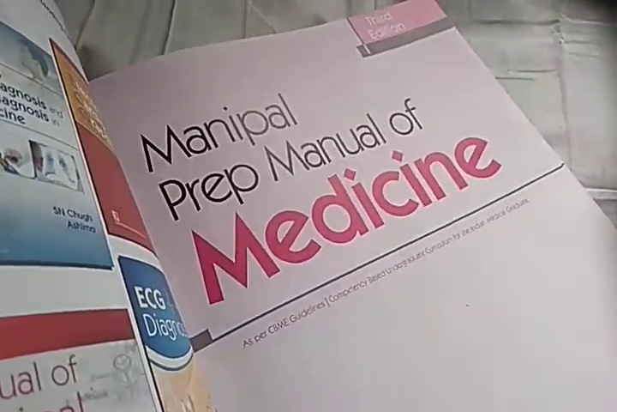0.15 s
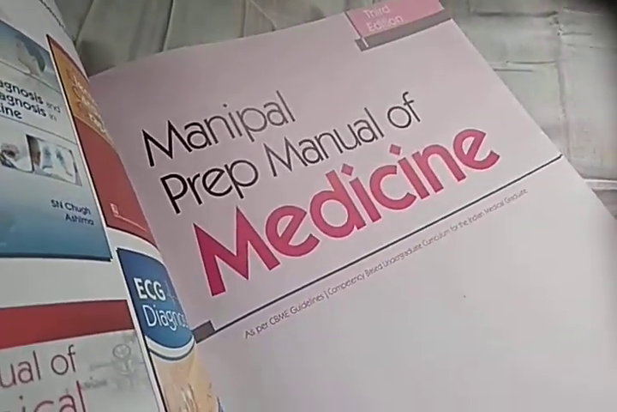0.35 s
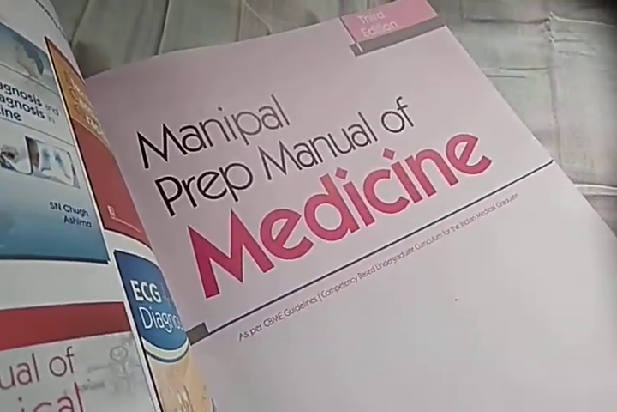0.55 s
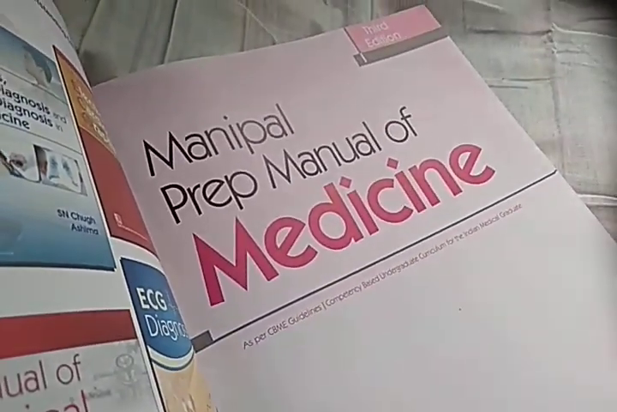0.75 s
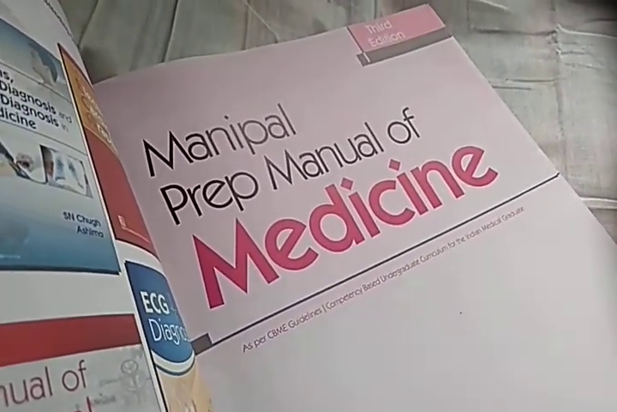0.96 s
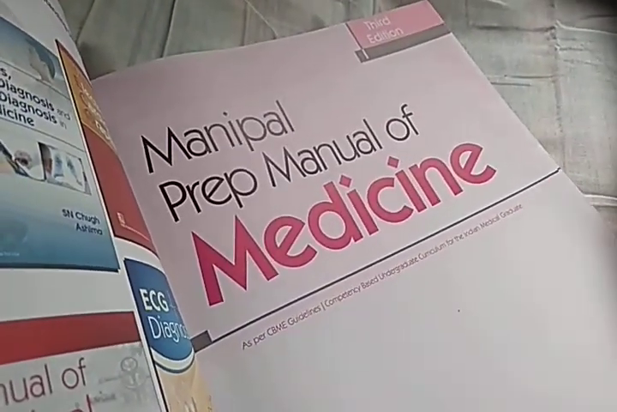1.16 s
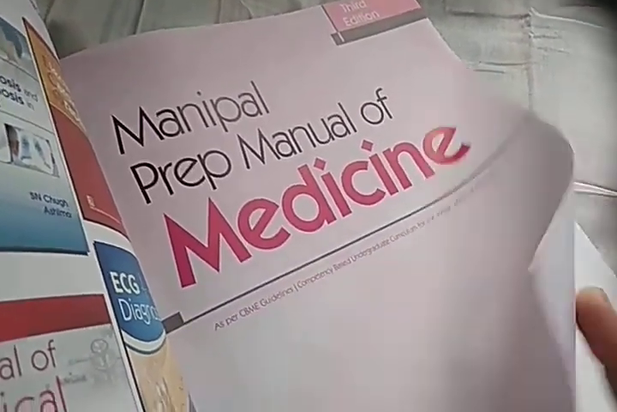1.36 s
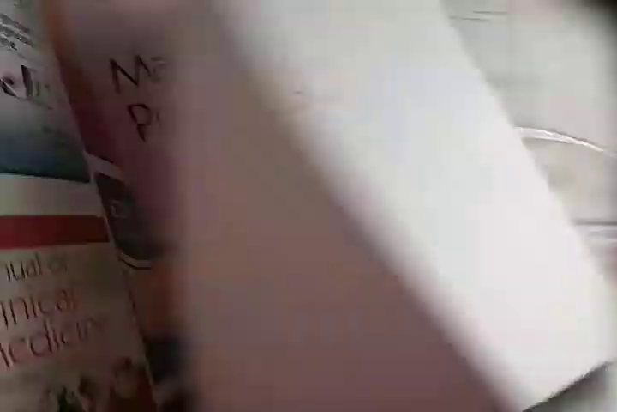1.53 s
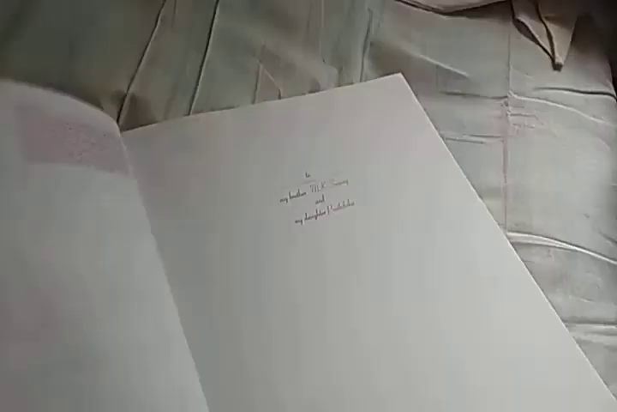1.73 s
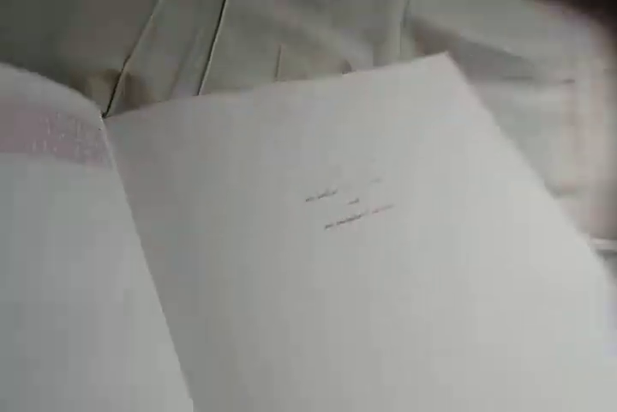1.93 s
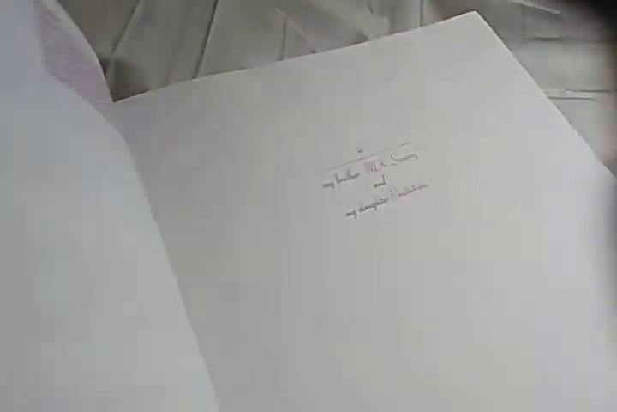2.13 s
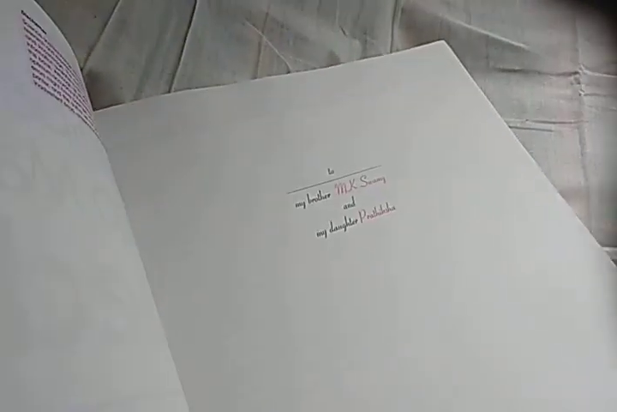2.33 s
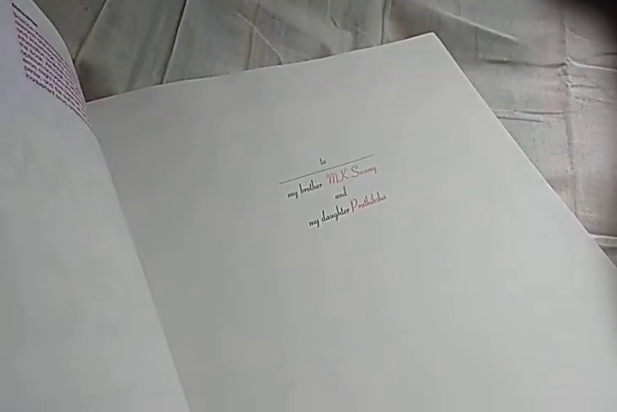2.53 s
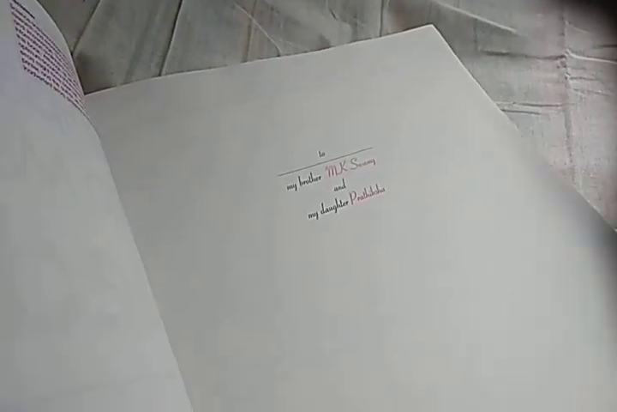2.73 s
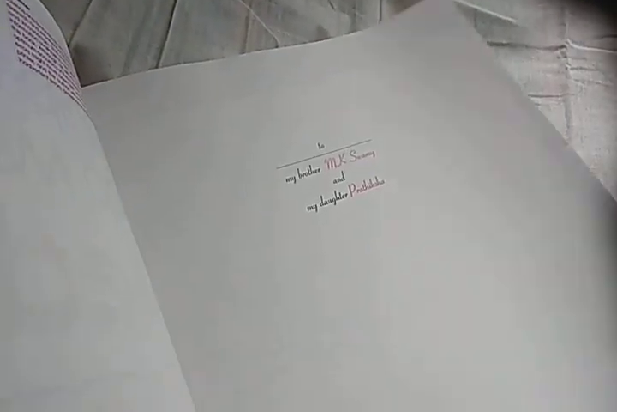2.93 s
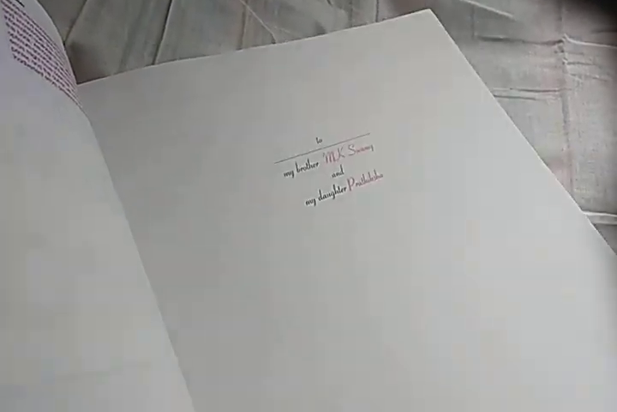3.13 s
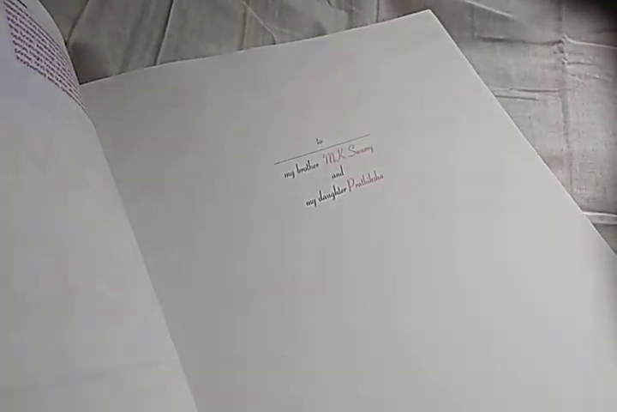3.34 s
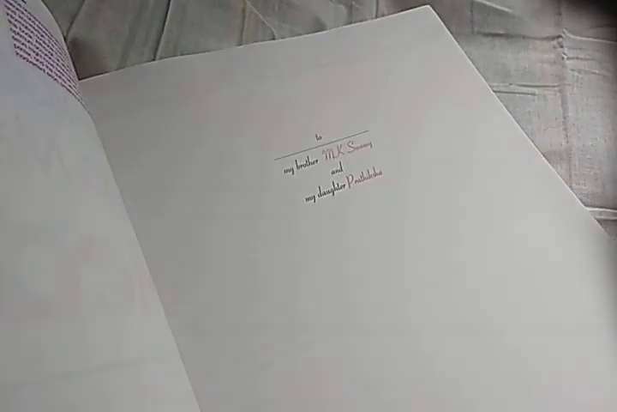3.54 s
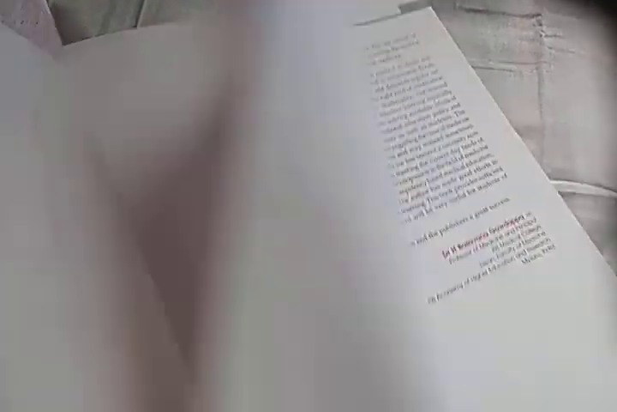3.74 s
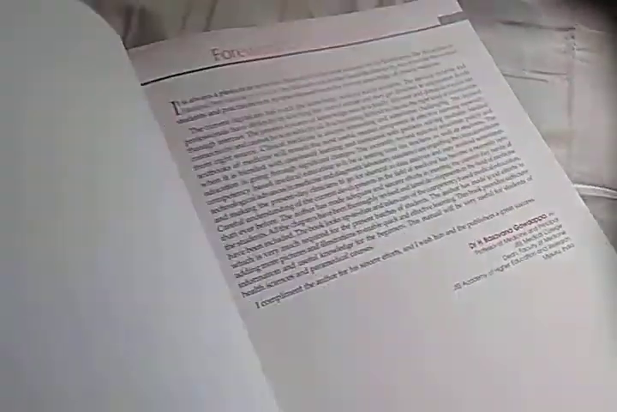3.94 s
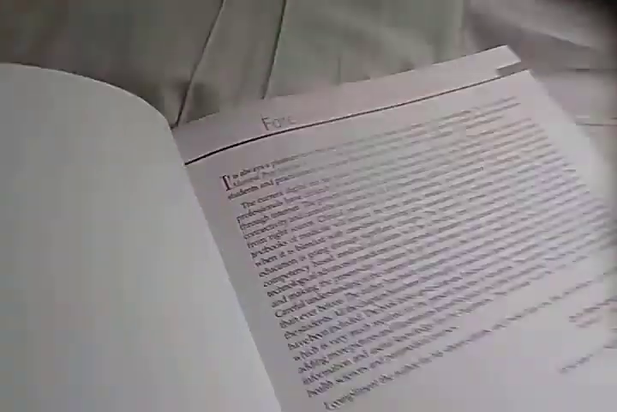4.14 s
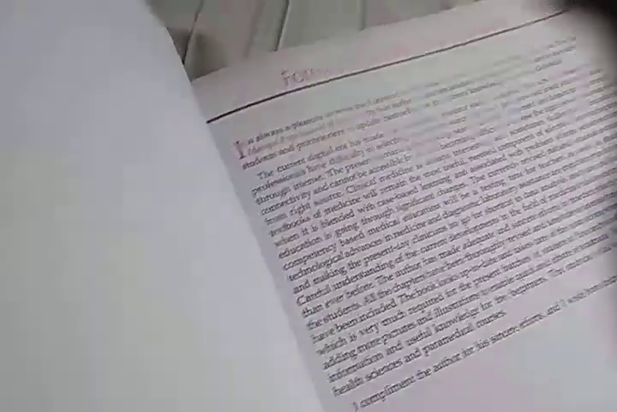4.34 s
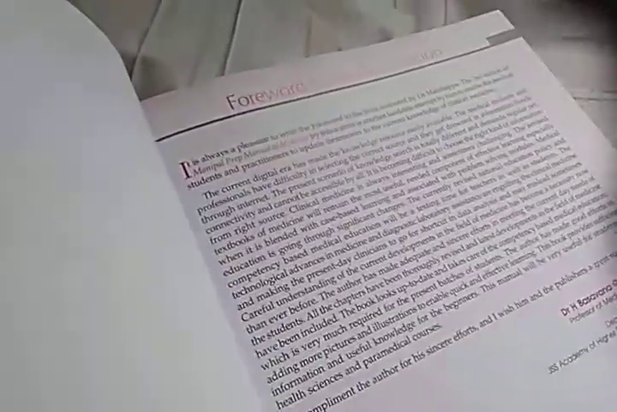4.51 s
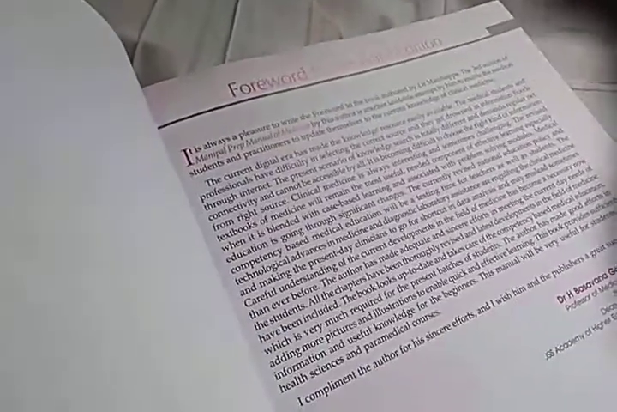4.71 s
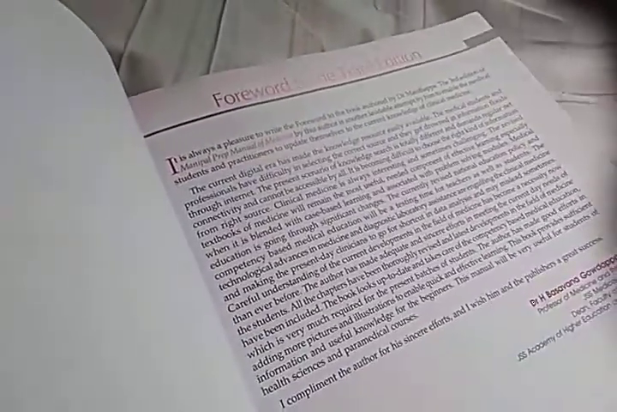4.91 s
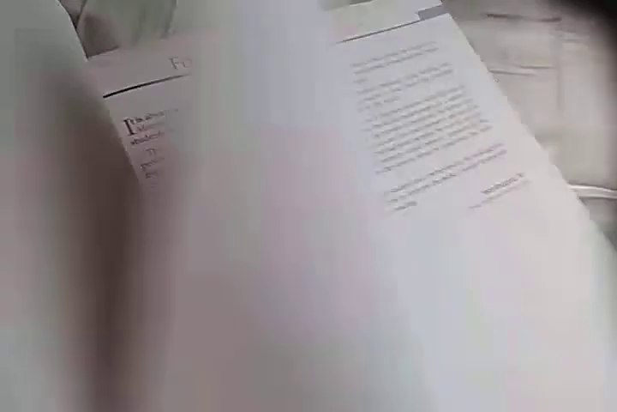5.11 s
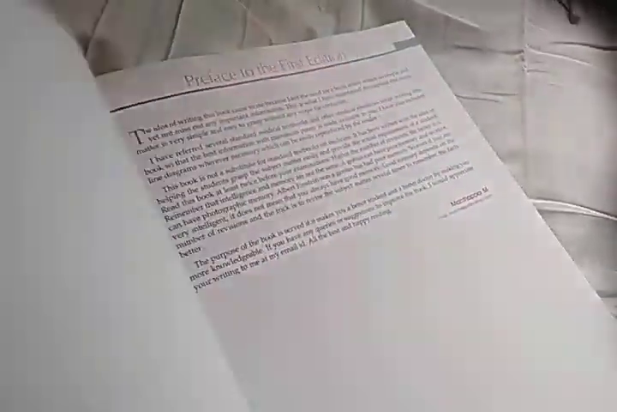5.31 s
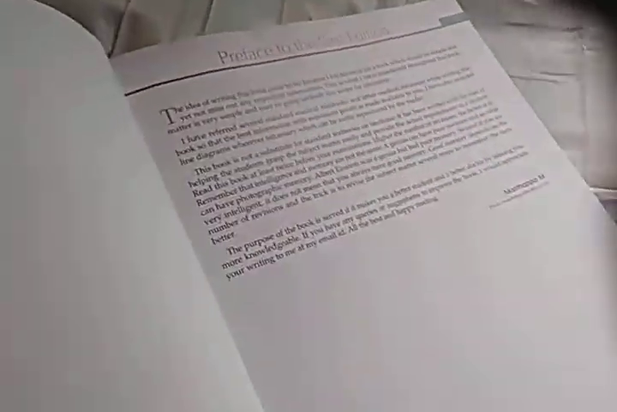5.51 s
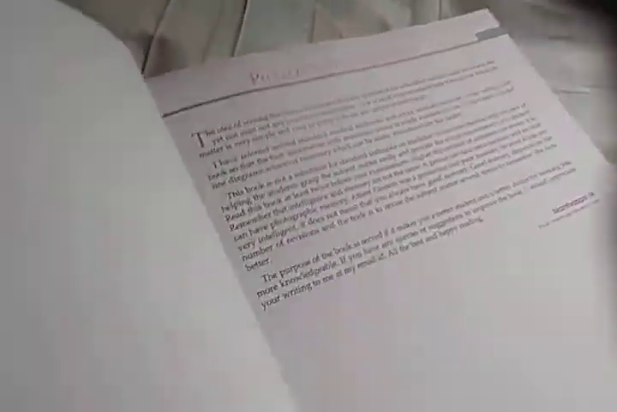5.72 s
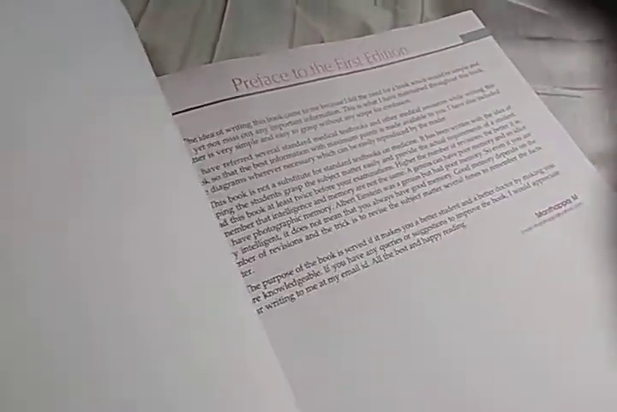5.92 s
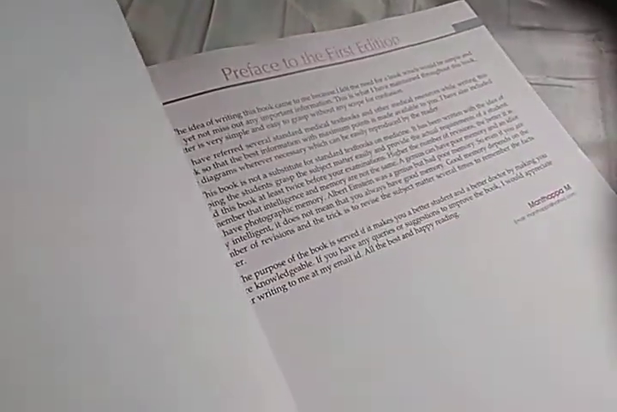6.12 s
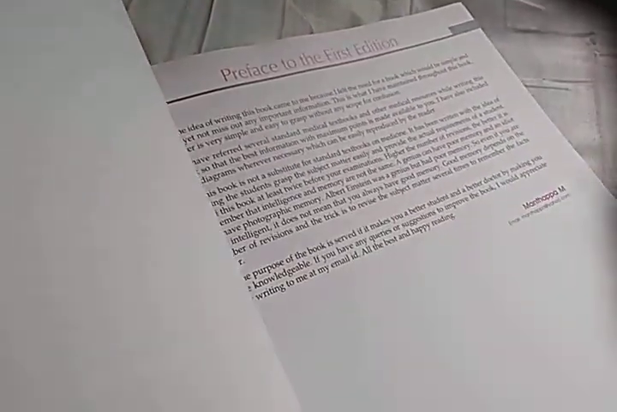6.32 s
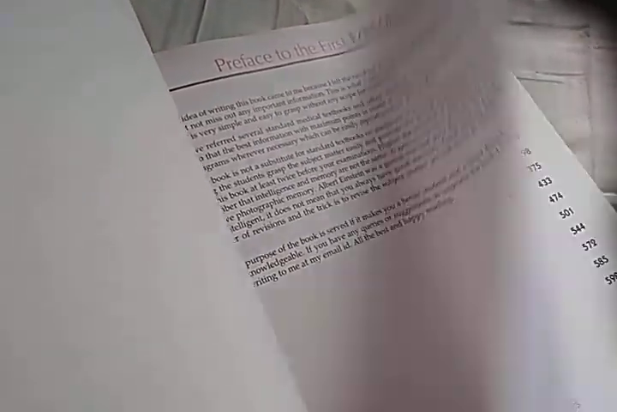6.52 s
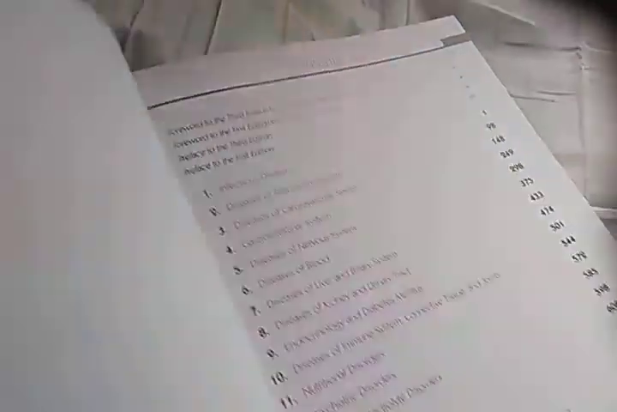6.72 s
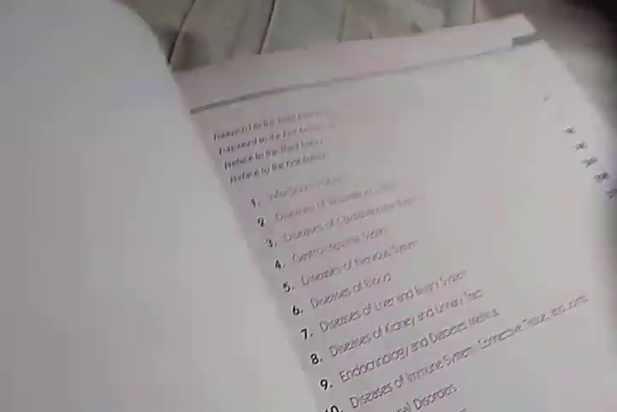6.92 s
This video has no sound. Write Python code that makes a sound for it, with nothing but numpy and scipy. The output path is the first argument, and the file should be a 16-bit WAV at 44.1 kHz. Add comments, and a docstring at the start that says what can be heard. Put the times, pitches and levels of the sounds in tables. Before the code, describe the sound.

Four pages of a thick paperback are turned on a bed, rustling, crackling and thudding softly, with near silence between turns.

```python
"""On a bed in a quiet room, a hand turns four pages of a paperback close to two microphones.
Sliding fingers and sheets hiss and scrape, made from thousands of tiny random slips.
Buckling paper snaps: shaped noise bursts give a bright tick, a duller crack and a rattle.
The bending book mutters through ringing filters, and landings thump as short damped low waves.
The snaps leave a brief echo, and the room adds a very faint hiss."""
import sys
import numpy as np
from scipy import signal
from scipy.io import wavfile
from scipy.ndimage import uniform_filter1d

SR = 44100
rng = np.random.default_rng(int(sys.argv[2]) if len(sys.argv) > 2 else 0)


def persist_wave(psi):
    """Save psi, clipped to +-1, as 16-bit WAV."""
    counts = np.round(np.clip(psi, -1, 1) * 32767).astype(np.int16)
    wavfile.write(sys.argv[1], SR, np.atleast_2d(counts).T)


N = 306936

# Signs for left and right: half of a left-minus-right difference goes to each side
EAR_SIGNS = np.array([[1], [-1]])

# A finger or sheet slides: start_s, rise_s, hold_s, hiss_level_db, fade_db_per_s, scrape_over_hiss_db
STROKES = [(0.0, 0.00075, 0.035, -56.5, 129, -9), (.245, 0.043, 0.052, -63, 153, -5),
           (.56, 0.045, 0.064, -72, 110, -6), (.745, 0.0049, 0.046, -55.5, 177, -8.5),
           (.895, 0.008, 0.0023, -47, 902, -13.5), (.92, 0.0083, 0.34, -65, 200, -1.5),
           (1.06, 0.017, 0.0053, -41, 450, -37), (1.08, 0.019, 0.32, -46, 220.5, -22.5),
           (1.3, 0.13, 0, -35.5, 298, -18.5), (1.43, 0.13, 0.089, -37.5, 176, 3.5),
           (1.58, 0.11, 0.05, -31, 212, -6.5), (1.86, 0.18, 0.037, -40, 148, -17.5),
           (2.04, 0.059, 0.062, -37, 133, -19), (2.38, 0.018, 0, -54.5, 199.5, -44.5),
           (2.45, 0.026, 0, -55.5, 141, -42.5), (2.53, 0.012, 0.049, -59, 251, -44.5),
           (2.65, 0.056, 0.022, -48.5, 171, -24), (2.855, 0.019, 0.068, -46, 275, -5.5),
           (3.015, 0.022, 0.029, -44, 120.5, -2.5), (3.04, 0.1, 0.00042, -38.5, 410, -22.5),
           (3.17, 0.021, 0, -51.5, 174, -32.5), (3.4, 0.023, 0.013, -50, 394, -42),
           (3.47, 0.17, 0.0042, -44.5, 148.5, -23), (3.685, 0.043, 0, -38, 247.5, -1),
           (3.72, 0.036, 0.033, -46.5, 200, -2.5), (3.81, 0.052, 0.1, -25, 105, -7.5),
           (4.11, 0.037, 0.019, -31.5, 191, -10), (4.23, 0.063, 0, -37.5, 103, -9.5),
           (4.46, 0.016, 0.01, -39.5, 235, -17.5), (4.59, 0.024, 0.2, -68, 91, -25),
           (4.9, 0.06, 0.032, -48.5, 204, -12.5), (5.04, 0.0037, 0.0073, -44, 88, -1.5),
           (5.16, 0.036, 0, -26.5, 96, -6.5), (5.23, 0.013, 0.16, -34.5, 137, -2),
           (5.41, 0.076, 0.11, -40.5, 57.5, -15), (5.585, 0.012, 0.082, -40, 153.5, -3),
           (5.74, 0.031, 0.055, -44, 95.5, -10.5), (5.86, 0.016, 0.064, -55, 204.5, -19),
           (5.94, 0.02, 0.022, -43, 189, -15.5), (6.07, 0.0066, 0.031, -53, 499, -30),
           (6.17, 0.061, 0.3, -74.5, 95, 4.5), (6.355, 0.02, 0.088, -44.5, 202, -16),
           (6.5, 0.09, 0.055, -47, 198, -9.5), (6.603, 0.015, 0.041, -28, 202, -19),
           (6.62, 0.058, 0.041, -20.5, 243, -6.5), (6.73, 0.0072, 0.073, -32.5, 239, -5),
           (6.85, 0.0092, 0.041, -33.5, 200, -11), (6.892, 0.0046, 0.033, -39, 216, -27)]
# Colour of the fine hiss: pitch_hz, relative_level_db (per Hz)
HISS_COLOUR = [(2000, -43.5), (3200, -18.5), (3900, -17), (5600, -10), (8100, -0.5), (11400, 4.5),
               (14000, 1.5), (15800, -3.5), (16300, -32.5), (16700, -64.5)]
# Colour of the coarse scrape: pitch_hz, relative_level_db (per Hz)
SCRAPE_COLOUR = [(300, -41.5), (800, -3), (1300, -4), (2500, 5), (4000, -1.5), (6000, -1), (12000, -26)]
# Colour of the scrape as the sheet curls: time_s, lean_db_per_octave (around 1978 Hz)
CURL = [(0,-1),(.7,0),(1.2,5),(1.45,-5),(1.62,-3.5),(1.75,-2),(1.949,5.5),(2.15,2),(2.4,-2),(2.8,-3),(3.05,-1),(3.4,7),(3.65,-6),
        (3.84,0),(3.93,-4),(4.05,-0.5),(4.15,1),(4.3,1),(4.6,2),(4.95,2.5),(5.08,-2.5),(5.2,-0.5),(5.32,-4.5),(5.42,-5),(5.53,6.5),
        (5.62,-2.5),(5.75,1.5),(5.95,0.5),(6.3,2),(6.5,5),(6.63,-3),(6.75,-5.5),(6.85,2),(6.96,-5)]
# The air wedge under a lifting sheet rings and glides: start_s, length_s, from_hz, to_hz, lift_db
WEDGES = [(3.695, .07, 2090, 2800, 8), (3.86, 0.13, 1290, 2900, 1), (4.12, 0.061, 1190, 2510, 17),
          (5.2, .12, 2600, 1500, -3), (6.62, 0.11, 2270, 3050, 2), (6.76, 0.049, 2330, 3520, 0)]
# Where the hand works and how bright the paper is:
# time_s, bass_left_minus_right_db, hiss_left_minus_right_db, treble_lean_db_per_octave (before the level's effect)
HAND_SIDES = [(0.0, 4, 4.5, -12), (0.13, 9, 10.5, -9), (0.21, 25.5, 0, -4), (0.29, 3, 3, 7),
              (0.7, 20, 5, -1), (0.75, 10, 4, -9), (1.2, 10, 4.5, -6.5), (1.278, 7, 7, -8),
              (1.45, 14.5, 1.5, -5), (1.72, 4.5, 2.5, -1), (1.848, 6, 1, -5), (2.02, 2, 2, 6),
              (2.09, -2, -3, 0), (2.13, 7.5, 6, 2), (2.42, 12.5, 6, -12.5), (2.95, 1.5, 5.5, -13),
              (3.221, 12.5, 1.5, -3), (3.59, -5, 11.5, -9), (3.82, 2, 1, -0.5), (3.952, 2, 3.5, -2.5),
              (4.11, 5, 1, -5.5), (4.27, 2, 7.5, 0), (4.3, -6, 3, -1), (4.571, 22, 4, -2),
              (4.881, -4.5, 7.5, -14), (5.1, 6, 3, -9.5), (5.18, -0.5, 2.5, -6), (5.462, 4, 0, -2),
              (5.75, 2, 2, -5), (6.07, 5.5, 5.5, -4), (6.55, 11, 4.5, -7.5), (6.7, -2, 0.5, -5),
              (6.9, 1, 1.5, -2), (6.96, 2, 6, -7)]

# The hand bends the book: start_s, rise_s, hold_s, bass_level_db, fade_db_per_s, upper_over_bass_db
BENDS = [(.01, 0.01, 0.0017, -55, 587, -29), (.055, 0.0075, 0.088, -57, 900, -3.5),
         (.18, 0.011, 0.035, -53.5, 1200, -6.5), (.245, 0.02, 0.017, -58, 600, -8),
         (.305, 0.0024, 0.013, -38.5, 1185, -9), (.335, 0.0057, 0.088, -55, 610, -11.5),
         (.588, 0.019, 0, -57, 695, -44), (.865, 0.0084, 0.0087, -67, 87, 0),
         (1.06, 0.12, 0.022, -57.5, 132, -5), (1.29, 0.03, 0.037, -51, 202.5, -11),
         (1.4, 0.1, 0.17, -22.5, 500, -12), (1.58, 0.021, 0.15, -27, 196, -9),
         (1.82, 0.032, 0.17, -42.5, 68.5, -12.5), (1.99, 0.043, 0.044, -28, 245, -11.5),
         (2.11, 0.0069, 0.063, -37.5, 157, -10), (2.845, 0.014, 0.0099, -50.5, 792.5, -4.5),
         (2.935, 0.0084, 0, -52, 500, -8), (2.995, .005, 0.097, -54.5, 703, -3),
         (3.014, 0.0038, 0.0077, -34.5, 704, -10), (3.03, 0.0067, 0.12, -48, 987.5, -17),
         (3.6, 0.031, 0.13, -73, 307, -5), (3.66, 0.015, 0.075, -41.5, 192, -6),
         (3.805, 0.027, 0.011, -21.5, 380, -7), (3.84, 0.059, 0.055, -31, 88, -1.5),
         (4.11, 0.012, 0.15, -36.5, 302, -6.5), (4.29, 0.0066, 0, -24.5, 188, -13),
         (4.96, 0.023, 0, -51, 498, -6), (5.032, 0.0021, 0, -31.5, 202, -2),
         (5.155, 0.023, 0, -14.5, 408, -5.5), (5.19, 0.013, 0.082, -35, 100, -1.5),
         (5.33, 0.039, 0.017, -25, 365, -9), (5.45, 0.0094, 0.025, -40, 282, -30),
         (5.577, 0.0031, 0, -32, 109.5, -1.5), (5.68, 0.0083, 0.052, -37.5, 117, -6),
         (5.77, 0.037, 0.04, -35.5, 1197, -10), (5.93, 0.0031, 0.038, -39, 888.5, -14),
         (6.6, 0.0053, 0.064, -30, 106, -2), (6.77, 0.013, 0.0024, -46, 217, 9),
         (6.875, 0.0043, 0, -41.5, 99.5, -1)]
# Low ringing tones of the book: pitch_hz, width_hz, relative_level_db
LOW_MODES = [(46, 43, -12.5), (78.5, 56, 28.5), (138.4, 27, -4.5), (213, 130, 2), (328, 71, -3.5)]
# High ringing tones of the book: pitch_hz, width_hz, relative_level_db
HIGH_MODES = [(419, 64, -2.5), (510.5, 40, -0.5), (622.6, 35, 0.5), (727.6, 32, -0.5), (860, 22, -2)]
# Ringing tones while the hand grips the pages: pitch_hz (before the firmer grip), width_hz, relative_level_db
GRIPPED_MODES = [(276, 40, 2), (543, 65, -1), (754, 42, -2)]
# How stiffly the book answers:
# time_s, bass_lean_db_per_octave (around 180 Hz), upper_lean_db_per_octave (around 460 Hz)
STIFFNESS = [(0, 2, -5), (.3, -1, -2.5), (.4, -2, -8), (.9, -1, 3), (1.15, 1, -12), (1.401, -0.5, 1.5),
             (1.8, 2.5, -3.5), (2.1, 3.5, -3.5), (2.4, -2.5, -3), (3.05, 1, 2), (3.7, 1, 2),
             (3.95, 5.5, -1), (4.3, 2, -4.5), (4.9, 0.5, 1), (5.17, 0, 3), (5.25, 7, -1.5), (5.4, 6, -1.5),
             (5.6, 7, -2), (5.75, 8, -2), (5.85, 3.5, -2.5), (6.0, 4.5, -2), (6.619, -0.5, -1.5),
             (6.75, 1.5, -3), (6.82, 1, -6), (6.96, 3, -2.5)]

# A sheet buckles: start_s, peak_db, treble_over_whole_db, dull_pitch_hz, left_minus_right_db, decay_ms
SNAPS = [(0.2566,-52,4,3500,-8,1.4),(0.3168,-38.5,1,1070,6.5,2.9),(0.7475,-51.5,-1.5,3500,-2,1.9),(1.071,-64,-18,3500,1.5,2),
         (1.4535,-29.5,-26,2700,5,2.2),(1.4717,-27,-27.5,2740,1,2.6),(1.504,-30,-25,2230,2.5,2.6),(1.515,-35,-29,2580,2,2),
         (1.5248,-23,-23,2400,2,2.3),(1.526,-30.5,-25,4004,-2,2),(1.536,-33,-24.5,2490,2,2),(1.579,-27.5,-22.5,1298,-5,2),(1.586,-10.5,-24.5,1950,3.5,2.2),(1.5877,-23,-27,3830,-0.5,1.7),(1.5995,-22.5,-12,1389,-2.5,2.7),
         (1.611,-31,-25.5,1900,2,2),(1.6259,-23,-20.5,1650,4.5,3.7),(1.678,-35,-25,2300,2,2.4),(1.697,-37.5,-20,2340,11,1.5),(1.7132,-30.5,-22.5,2290,1.5,1),(1.735,-33.5,-30,895,2,1.7),(1.876,-58,-30,750,0,2),(1.9095,-50,-30,790,-2,2),(2.042,-46,-11,1209,11,2.1),
         (2.8744,-64,15,2180,4.5,2.6),(3.0255,-47,-4.5,2295,8,1.95),(3.4274,-41.5,9.5,3830,5,2.1),(3.495,-65,12.5,4010,0,2),
         (3.526,-54.5,12.5,4050,2,2),(3.5345,-66,6,4360,-0.5,2),(3.6877,-11.5,-1,3100,2.5,1.66),(3.6965,-28,5,6050,2.5,2.5),(3.7075,-29.5,5,6000,3.5,2.5),(3.6885,-27.5,-19,1100,-3.5,1.5),(3.869,-37.5,-25,2300,2,2),(3.917,-34,-21.5,1210,-4,2.9),
         (3.934,-26.5,-39,1600,2,1.6),(3.954,-35,-25,1510,1.5,2),(4.3092,-36,-0.5,1236,13,2.8),(4.465,-41,18.5,4300,9,2),
         (4.8319,-54,12,4450,3.5,1.75),(4.843,-54,15,4450,11,2),(4.906,-52,-1,4000,6.5,2),(5.0431,-23,-4.5,3060,4,1.7),(5.0432,-30.5,-20,1600,6.5,1.8),
         (5.3876,-21,-35,1300,3.5,1.2),(5.475,-41.5,-35,1630,5,1.4),(5.589,-16.5,-8,3410,-1.5,1.1),(5.59,-40,-22,1580,-4,2.16),(5.5933,-14.5,0,4220,4.5,1.1),
         (5.7126,-44.5,-21,2900,13,1.5),(5.882,-34,6,6010,4,6),(5.941,-46.5,-9.5,3720,6.5,2.07),(6.3614,-44.5,2,3530,5,1.6),
         (6.6101,-26,-1,3700,3,1.3),(6.6175,-29,-12,1370,7,2.1),(6.64,-30,-2.5,3920,-9,2.2),(6.7215,-24,-22,1130,-1,3.2),
         (6.741,-23.5,-12,2650,4.5,1.6),(6.8924,-13.5,-0.5,2780,3,1.4),(6.8925,-24,-16,5060,0.5,1.1),(6.905,-37,5,6000,-4,2),(6.9118,-30,5,6000,2,2.5)]
# Colour of the bright tick: pitch_hz, relative_level_db (per Hz)
TICK_COLOUR = [(2000, -36.5), (3500, -11), (5600, -6.5), (8100, -0.5), (11400, 2.5), (13500, -3),
               (15800, -16), (16700, -64.5)]
# Colour of the dull crack: multiple_of_its_pitch, relative_level_db (per Hz)
CRACK_COLOUR = [(.2, -20.5), (.5, -9.5), (.75, -8), (1, -0.5), (1.35, -7), (1.698, -11.5), (2.3, -23),
                (3.002, -35.5), (5.001, -45)]

# The book or a finger lands: time_s, peak_db, pitch_hz
THUMPS = [(0.0652, -29.5, 224), (0.114, -38.5, 158), (0.198, -40, 97), (0.246, -44, 165), (.308, -62, 520),
          (0.3156, -20, 114), (0.36, -41.5, 211), (0.412, -44, 122), (0.517, -54, 131), (0.548, -62, 125),
          (0.597, -43.5, 188), (0.692, -52.5, 116), (0.722, -54.5, 174), (0.875, -42, 103),
          (0.963, -46, 162), (1.133, -44, 234), (1.163, -43, 290), (1.169, -42, 288), (1.189, -46, 280),
          (1.342, -45, 140), (1.4416, -21, 100), (1.464, -15.5, 94), (1.486, -30, 127), (1.509, -18, 150),
          (1.524, -10, 202), (1.537, -21, 140.2), (1.547, -12.5, 143), (1.5716, -14, 99),
          (1.6077, -17, 111), (1.64, -19, 117), (1.6559, -19.5, 160), (1.78, -28, 170), (1.8244, -28, 108),
          (1.853, -34.5, 116), (1.8774, -30, 417), (1.881, -26.5, 214), (1.911, -28.5, 610),
          (1.912, -22.5, 328), (1.998, -35, 158), (2.1393, -22.5, 123), (2.224, -39, 147),
          (2.278, -36.5, 114.5), (2.346, -42, 131), (2.38, -43.5, 127.4), (2.437, -54.5, 129.4),
          (2.861, -55, 224), (2.945, -39, 200), (3.017, -29, 644), (3.0202, -32.5, 268), (3.064, -51, 250),
          (3.11, -38, 172), (3.217, -61, 128), (3.246, -48.5, 127.6), (3.383, -73.5, 128.5),
          (3.462, -68.5, 131), (3.68, -23, 780), (3.686, -23, 487), (3.8152, -2.5, 200), (3.816, -17, 55),
          (3.8192, -13.5, 188), (3.845, -35, 790), (3.892, -33, 214), (3.9156, -19.5, 323),
          (4.117, -28, 473), (4.255, -35, 344), (4.272, -26.5, 308), (4.3095, -24, 250), (4.332, -32, 108),
          (4.499, -49, 202), (4.531, -50, 123.4), (4.591, -52, 138), (4.667, -44, 162.7),
          (4.969, -45.5, 173.4), (4.988, -32.5, 760), (5.038, -29.5, 504), (5.1642, -1.5, 240),
          (5.1643, -12, 640), (5.167, -24.5, 60), (5.1775, -12, 110), (5.1865, -24, 131), (5.19, -25, 646),
          (5.269, -40, 350), (5.3783, -21.5, 283), (5.5828, -24, 346), (5.638, -32, 338), (5.693, -22, 300),
          (5.7064, -21, 250), (5.741, -24.5, 320), (5.8, -31, 303), (5.842, -29, 75), (5.952, -34, 216.5),
          (6.126, -67, 121), (6.61, -22.5, 708), (6.611, -18.5, 110), (6.642, -21.5, 249),
          (6.646, -22.5, 90), (6.655, -20, 130), (6.714, -20.5, 407), (6.78, -27.5, 314),
          (6.8877, -26.5, 490), (6.911, -39, 320), (6.947, -38, 289.6)]
# A finger lets go and the book springs back: time_s, peak_db, pitch_hz
REBOUNDS = [(0.3117, -23, 248), (0.909, -43.5, 147), (1.069, -49.5, 158), (1.2028, -46, 200),
            (1.565, -14.5, 109), (1.7842, -22.5, 173), (2.0485, -28.5, 190.4), (4.3036, -20, 250),
            (5.4685, -22.5, 271), (5.8192, -28.5, 238), (6.6342, -22.5, 299)]

# Colour of the room hiss: pitch_hz, relative_level_db (per Hz)
ROOM_COLOUR = [(24, -37.5), (40, -5), (121, -9.5), (332, -10.5), (2430, -15.5), (3640, -2), (9720, 2),
               (12800, -1.5), (16500, -45.5)]

ONSET_POWER = 0.89  # a movement swells as this power of the elapsed rise
SLIDE_REST_DB, BEND_REST_DB = -84.5, -93.5  # the hands are never quite still
SCRAPE_FADE, UPPER_FADE = 1.214, 1.13  # the second layer fades this many times faster
LEFT_LATE_MS = 0.22  # the left microphone is a little farther from the book
TILT_PER_DB = 0.0835  # treble lean (dB per octave) for each dB of hiss above -28 dB; less when below
RIGHT_PER_DB = 0.23  # dB of top treble toward the right for each dB of hiss above -53 dB
CRINKLES_PER_S, CRINKLE_DB = 60, -9  # average pops per second at each pitch; level against the scrape
CRINKLE_HZ = (1130, 1830, 2960, 5100)
WEDGE_OCT = 0.1  # width of the wedge's ringing band, in octaves
REGRIP_S, REGRIP_RISE, RELEASE_S = 0.7, 1.12, 1.38  # a firmer grip raises the tones, then lets go
RATTLE_DB, RATTLE_PER_DB, RATTLE_T60_S = -8.5, -1.16, 0.017  # at a -31 dB snap; harder snaps are drier
TICK_SHARE, GIVE_SHARE = 0.6, 0.55  # decay of the tick and rise of the crack, as shares of the decay
SHUDDER_T60_S = 0.026  # time for the shudder to drop 60 dB
THUMP_PAN_DB, THUMP_PAN_PER_OCT = -1, 1  # added to the hand's side at 200 Hz, and per octave above
THUMP_SPLIT, THUMP_LATE_MS = 0.05, 0.24  # a thump is this share lower in pitch on the left, and late there
JOLT_SAME = 0.69  # share of each jolt's power common to both microphones
ROOM_DB = -90
RIGHT_BASS_HZ, EDGE_HZ = 60.3, 16600  # the right microphone loses bass below; both lose treble above


def slide():
    """Paper fibres catch and slip: dense fine slips hiss, sparser coarse ones scrape."""
    hiss_db, scrape_db = movements(STROKES, SLIDE_REST_DB, SCRAPE_FADE)
    t = np.arange(N) / SR
    _, pan_db, lean = sides(t)
    tilt = lean + TILT_PER_DB * (hiss_db + 28.0)
    fine = evened(colour(grains(15000, 1.3, 0.18, -0.2), HISS_COLOUR))
    fine = patchy(fine, tilt, 3.13, bins=4)
    # A sweeping sheet throws its top treble to the right
    top = signal.sosfilt(signal.butter(2, 6500, "high", fs=SR, output="sos"), fine)
    top_pan_db = -RIGHT_PER_DB * np.maximum(hiss_db + 53, 0)
    fine = fine + (gain_of(EAR_SIGNS * top_pan_db / 2) - 1) * top

    coarse = evened(colour(grains(8700, 0.3, 0.47, LEFT_LATE_MS), SCRAPE_COLOUR)) + crinkle()
    curl = np.interp(t, *np.transpose(CURL))
    coarse = patchy(coarse, curl, 3.1, 600, 1978, bins=4, wedges=WEDGES)
    both_layers = gain_of(hiss_db) * fine + gain_of(scrape_db) * coarse
    return gain_of(EAR_SIGNS * pan_db / 2) * flutter(23, 0.79) * both_layers


def crinkle():
    """Small creases pop in clumps, each ringing briefly at one of a few pitches."""
    pops = 0
    for hz in CRINKLE_HZ:
        clumps = grains(CRINKLES_PER_S, 1.4, 0.55, LEFT_LATE_MS) * flutter(45, 3.5)
        pops = pops + colour(clumps, np.array(CRACK_COLOUR) * [hz, 1])
    return gain_of(CRINKLE_DB) * evened(pops)


def bend():
    """Small jolts of the binding make the block of pages ring."""
    low_db, upper_db = movements(BENDS, BEND_REST_DB, UPPER_FADE)
    t = np.arange(N) / SR
    pan_db, upper_pan_db, _ = sides(t)
    at, lean, upper_lean = np.transpose(STIFFNESS)
    jolts = padded(grains(1500, 1.5, JOLT_SAME, LEFT_LATE_MS) * flutter(14, 2.5))

    # The heavy block answers mostly to slow pushes
    low = signal.lfilter([1], [1, -0.94], ring(jolts, LOW_MODES))
    low = signal.sosfilt(signal.butter(2, 520, fs=SR, output="sos"), low)
    low = patchy(evened(low), np.interp(t, at, lean), 2.1, 50, 180, size=2048, bins=4)

    # Ringing twice makes the upper tones stand out more
    firm_modes = np.array(GRIPPED_MODES) * [REGRIP_RISE, 1, 1]
    free_modes = LOW_MODES[3:] + HIGH_MODES
    loose, firm, free = [evened(ring(ring(jolts, modes), modes))
                         for modes in (GRIPPED_MODES, firm_modes, free_modes)]
    upper = np.where(t < REGRIP_S, loose, np.where(t < RELEASE_S, firm, free))
    upper = patchy(upper, np.interp(t, at, upper_lean), 3, 250, 460, size=2048, bins=4)
    low = gain_of(low_db + EAR_SIGNS * pan_db / 2) * low
    return low + gain_of(upper_db + EAR_SIGNS * upper_pan_db / 2) * upper


def snaps():
    """Buckling paper gives a quick tick, a slower crack and a rattle, partly different on each side."""
    t, out = np.arange(4000) / SR, np.zeros((2, N))
    for start_s, db, treble_db, hz, pan_db, decay_ms in SNAPS:
        left, right, both = rng.standard_normal((3, len(t)))
        noise = both + 1.2 * np.array([left, right])
        u = t * 1000 / max(decay_ms, 0.3)  # time counted in decays
        rattle = gain_of(RATTLE_DB + RATTLE_PER_DB * (db + 31.0) - 60 * t / RATTLE_T60_S)
        tick_shape = (1 - np.exp(-(t / 0.00046) ** 2)) * (np.exp(-u / TICK_SHARE) + rattle)
        crack_shape = (1 - np.exp(-(u / GIVE_SHARE) ** 2)) * (np.exp(-u ** 1.1) + rattle)
        tick = colour(noise * tick_shape, TICK_COLOUR)
        crack = colour(noise * crack_shape, np.array(CRACK_COLOUR) * [hz, 1])
        treble = min(gain_of(treble_db), 0.98)
        sound = treble * evened(tick) + np.sqrt(1 - treble ** 2) * evened(crack)
        # Set the peak of a short running level on each side
        peak = np.sqrt(np.max(uniform_filter1d(sound ** 2, 60), axis=1, keepdims=True))
        sound = gain_of(db + EAR_SIGNS * pan_db / 2) * sound / peak
        add(out[0], start_s + LEFT_LATE_MS / 1000, sound[0])
        add(out[1], start_s, sound[1])
    return out


def thumps():
    """A slow squeeze, a quick inward push that dies in a few cycles, and a shudder; rebounds push outward."""
    t, out = np.arange(-600, 5000) / SR, np.zeros((2, N))  # the push peaks at t = 0
    after = np.maximum(t, 0)
    shudder_modes = [(f, width, db - 8) for f, width, db in HIGH_MODES]
    landings = [(*row, 1) for row in THUMPS] + [(*row, -1) for row in REBOUNDS]
    for time_s, db, hz, direction in landings:
        pan_db = sides(time_s)[0] + THUMP_PAN_DB + THUMP_PAN_PER_OCT * np.log2(hz / 200)
        rise = np.exp(-(np.minimum(t, 0) * hz / 0.22) ** 2)
        # Above 300 Hz, higher taps ring for more cycles
        fall = np.exp(-after * hz / 0.67 / max(hz / 300, 1))
        ear_hz = hz * (1 - EAR_SIGNS * THUMP_SPLIT / 2)
        squeeze = 0.074 * np.exp(-((t + 0.0051) / 0.0062) ** 2)
        push = -np.cos(2 * np.pi * ear_hz * t) * rise * fall + squeeze

        left, right, both = padded(rng.standard_normal((3, len(t))))
        noise = both + 1.2 * np.array([left, right])
        shudder = evened(ring(noise, [(hz, hz * 0.82, 0)] + shudder_modes))
        shudder = shudder * rise * gain_of(-60 * after / SHUDDER_T60_S)
        sound = push + 0.047 * ring(push, HIGH_MODES) + 0.016 * shudder
        sound = gain_of(db + EAR_SIGNS * pan_db / 2) * direction * sound
        for ear, part, late_ms in zip(out, sound, (THUMP_LATE_MS, 0)):
            add(ear, time_s + t[0] + late_ms / 1000, part)
    return out


def echo(x):
    """Bed and walls return a short tail of scattered reflections, different at each microphone."""
    t = np.arange(6000) / SR
    flips = rng.choice([-1., 1.], (2, 6000))
    sparse = rng.random((2, 6000)) < 0.05
    taps = flips * sparse * gain_of(-60 * t / 0.096) * (t > 0.002)
    return signal.fftconvolve(x, taps / np.linalg.norm(taps[0]), axes=1)[:, :N]


def room():
    """The quiet room is a faint, uneven hiss of coloured noise."""
    hiss = evened(colour(rng.standard_normal((2, N)), ROOM_COLOUR))
    return gain_of(ROOM_DB) * patchy(hiss, np.zeros(N), 1.7, bins=4)


def movements(rows, rest_db, faster):
    """Each movement swells, holds and fades; gives the total levels of its two layers in dB."""
    t = np.arange(0, N + 32, 32) / SR
    power = np.full((2, 1), gain_of(2 * rest_db))
    for start_s, rise_s, hold_s, db, fade_db, over_db in rows:
        swell = np.clip((t - start_s) / max(rise_s, 0.001), 0, 1) ** ONSET_POWER
        fading_s = np.maximum(t - start_s - rise_s - max(hold_s, 0), 0)
        level = swell * gain_of(db - abs(fade_db) * np.array([[1], [faster]]) * fading_s)
        power = power + (level * gain_of([[0], [over_db]])) ** 2
    return [np.interp(np.arange(N) / SR, t, 10 * np.log10(p)) for p in power]


def sides(s):
    """Gives left minus right dB of bass and of hiss, and the treble lean, at the times s."""
    t, *columns = np.transpose(HAND_SIDES)
    return [np.interp(s, t, column) for column in columns]


def grains(per_s, spread_db, same, late_ms):
    """Random slips of uneven size; a share reaches both microphones, delayed on the left by late_ms."""
    size = gain_of(spread_db * np.minimum(rng.exponential(1, (3, N)), 5))
    left, right, both = size * rng.standard_normal((3, N)) * (rng.random((3, N)) < per_s / SR)
    same = np.clip(same, 0, 1)
    shared = np.array([np.roll(both, round(late_ms * SR / 1000)), both])
    return np.sqrt(1 - same) * np.array([left, right]) + np.sqrt(same) * shared


def flutter(ms, db):
    """Quick random unevenness of pressure, as a smoothed random gain."""
    x = uniform_filter1d(rng.standard_normal(N), max(round(ms * SR / 1000), 2))
    return evened(gain_of(db * evened(uniform_filter1d(x, 200))))


def patchy(x, tilt, patch_db, from_hz=4600, pivot_hz=9000, size=512, bins=18, wedges=()):
    """Random patches of pitch and time grow louder or softer; tilt leans the spectrum around a pivot."""
    hz, t, z = signal.stft(x, SR, nperseg=size, noverlap=size * 3 // 4)
    # A random map over pitch and time, smoothed both ways
    field = rng.standard_normal((z.shape[2], len(hz))).T
    field = uniform_filter1d(field, size=round(bins), axis=0)
    field = evened(uniform_filter1d(field, size=round(18 * 512 / size), axis=1))
    octaves = np.log2(np.clip(hz, from_hz, 3 * pivot_hz) / pivot_hz)[:, None]
    lean = np.interp(t, np.arange(N) / SR, tilt) * octaves
    for start_s, length_s, start_hz, end_hz, db in wedges:
        u = np.clip((t - start_s) / length_s, 0, 1)
        glide_hz = start_hz * (end_hz / start_hz) ** u
        away = np.log2((hz[:, None] + 1) / glide_hz) / WEDGE_OCT
        lean = lean + db * np.sqrt(np.abs(np.sin(np.pi * u))) * np.exp(-away ** 2)
    z = z * gain_of(patch_db * field + lean)
    return signal.istft(z, SR, nperseg=size, noverlap=size * 3 // 4)[1][:, :N]


def padded(x):
    """Soft paper and bedding pass little above the top ringing tone."""
    return signal.sosfilt(signal.butter(3, 950, fs=SR, output="sos"), x)


def ring(x, modes):
    """Sums simple ringing filters; a wider one dies away faster."""
    out = 0
    for hz, width, db in modes:
        r = np.exp(-np.pi * width / SR)
        feedback = [1, -2 * r * np.cos(2 * np.pi * hz / SR), r * r]
        out = out + gain_of(db) * signal.lfilter([1 - r, 0, r - 1], feedback, x)
    return out


def colour(x, points):
    """Filters x to the given colour, with no sound ahead of its cause (minimum phase)."""
    f, db = np.transpose(points)
    hz = np.abs(np.fft.fftfreq(4096, 1 / SR))
    log_gain = np.log(gain_of(np.interp(np.log(hz + 1), np.log(f + 1), db)))
    taps = np.fft.ifft(np.exp(np.conj(signal.hilbert(log_gain)))).real[:2048]
    return signal.oaconvolve(x, taps[None], axes=1)[:, :x.shape[1]]


def gain_of(db):
    """Turns decibels into a multiplier."""
    return 10 ** (np.asarray(db) / 20)


def evened(x):
    """Scales x to an average (rms) level of 1."""
    return x / np.sqrt(np.mean(x ** 2) + 1e-20)


def add(mix, s, sound):
    """Lays a sound into one channel, starting at s seconds."""
    part = mix[max(round(s * SR), 0):][:len(sound)]
    part += sound[:len(part)]


def scene():
    """Adds up paper, book, echo of the snaps, and room."""
    cracks = snaps()
    return slide() + bend() + thumps() + cracks + gain_of(-8.0) * echo(cracks) + room()


def record(dry):
    """Thins the right bass, cuts off peaks beyond full scale, then removes the highest treble."""
    right = signal.lfilter(*signal.butter(1, RIGHT_BASS_HZ, "high", fs=SR), dry[1])
    full = np.clip([dry[0], right], -1, 1)
    low_pass = signal.firwin(511, EDGE_HZ, window=("kaiser", 9), fs=SR)
    return signal.oaconvolve(full, low_pass[None], "same")


dry = scene()
out = record(dry)
persist_wave(out)
```